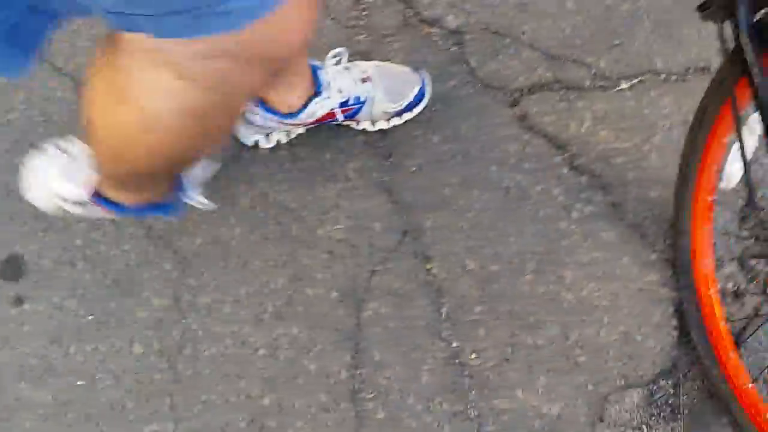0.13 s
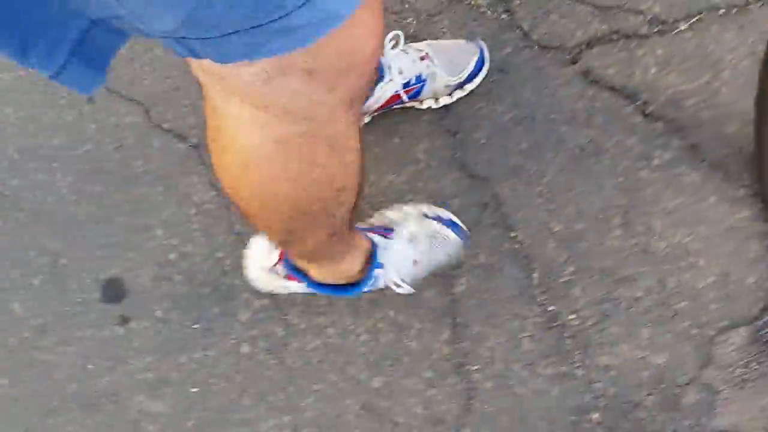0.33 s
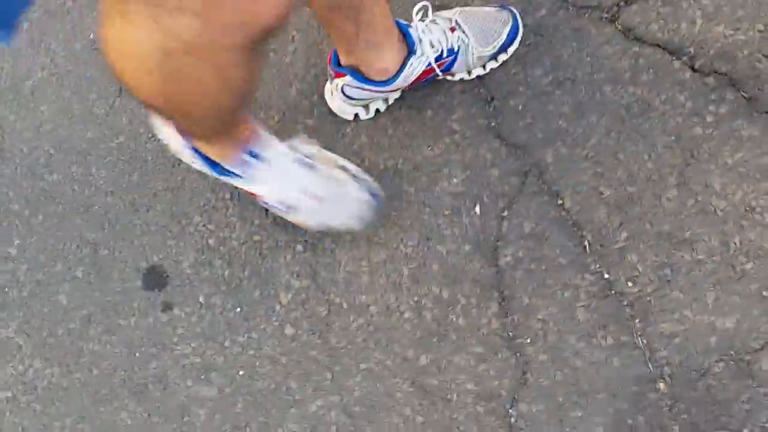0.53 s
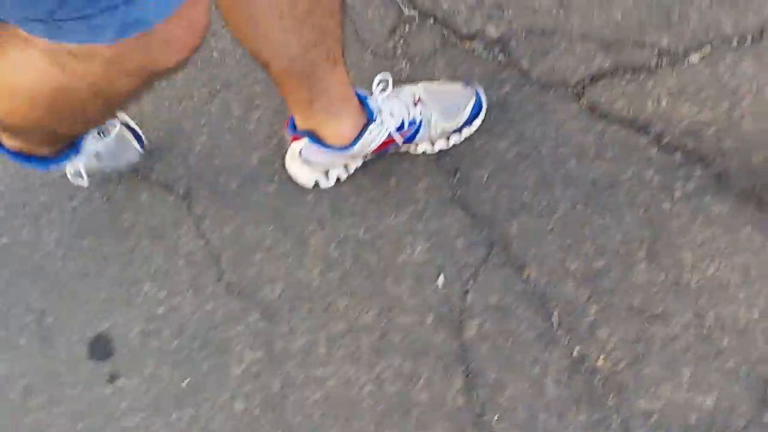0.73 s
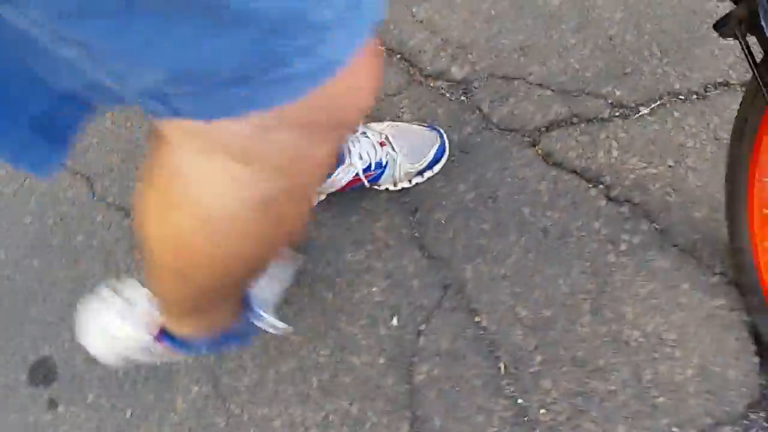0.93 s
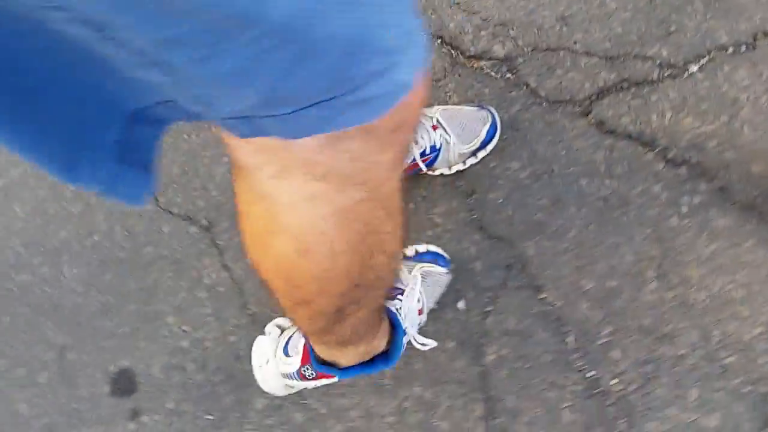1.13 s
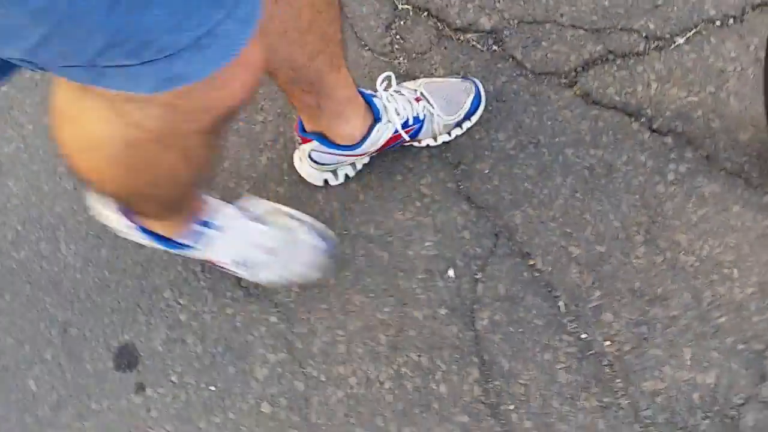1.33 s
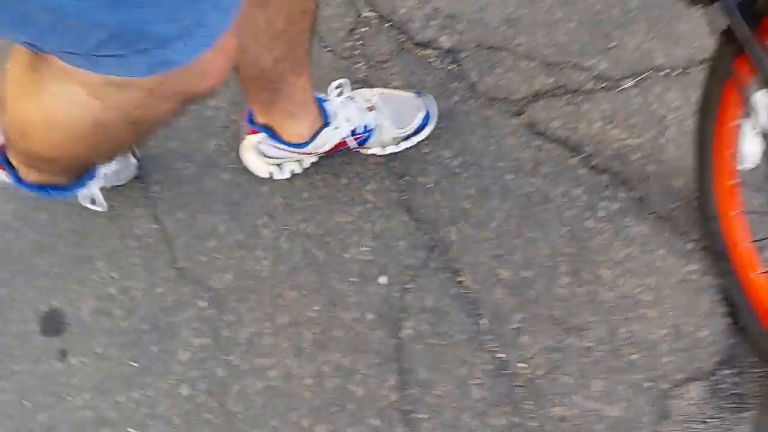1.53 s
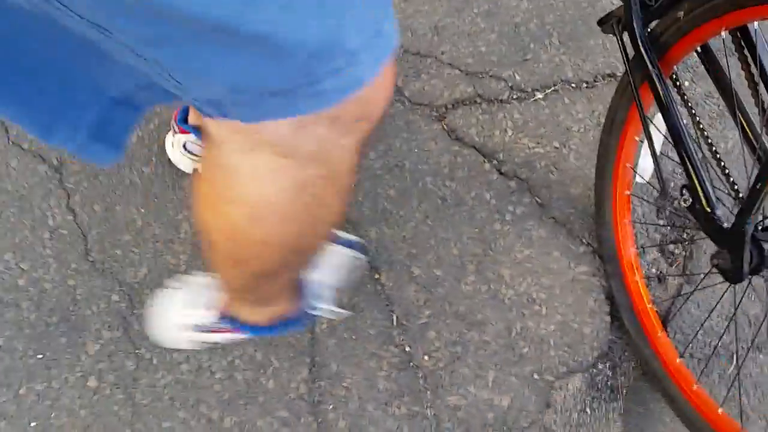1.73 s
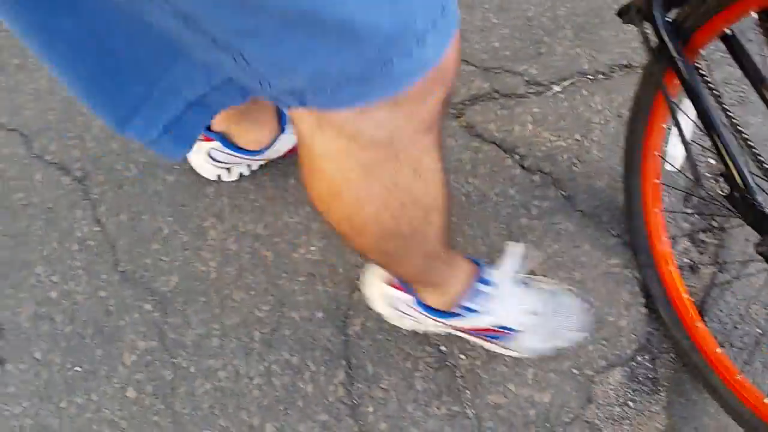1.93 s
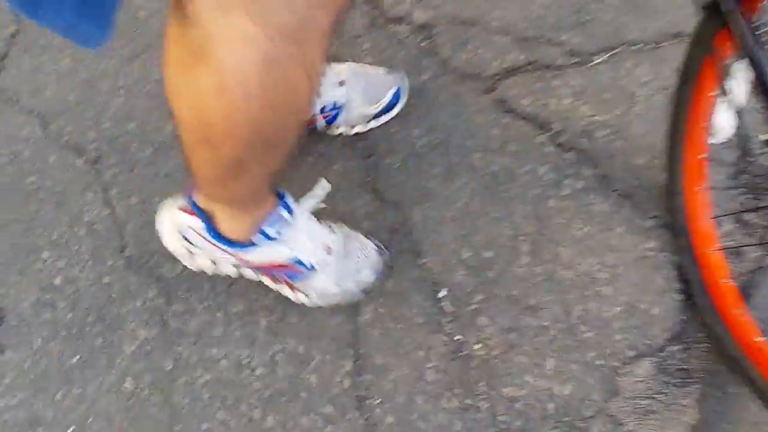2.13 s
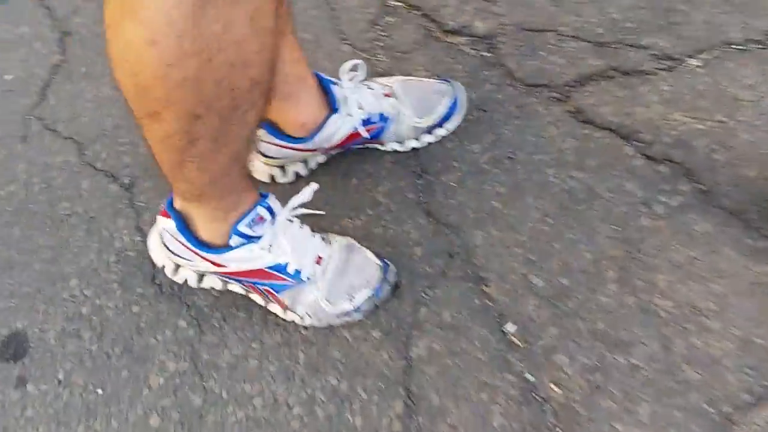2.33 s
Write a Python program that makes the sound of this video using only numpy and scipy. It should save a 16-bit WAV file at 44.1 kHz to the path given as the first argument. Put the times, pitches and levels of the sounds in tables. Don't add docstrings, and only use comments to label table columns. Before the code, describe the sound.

A rubber-soled sports shoe scuffs forward and drags back on rough asphalt, three forward scrapes growing harder with fainter drags between, then quiet distant traffic; outdoors near house fronts, close handheld phone with low wind buffeting.

```python
import sys
import numpy as np
from scipy import signal
from scipy.fft import rfft, irfft, next_fast_len
from scipy.io import wavfile
from scipy.ndimage import uniform_filter1d, map_coordinates

SR = 44100
rng = np.random.default_rng(int(sys.argv[2]) if len(sys.argv) > 2 else 0)


def decibels_to_gain(level_db):
    exponent = np.asarray(level_db, float) / 20
    return 10 ** exponent


def log_audio(samples):
    frames = np.atleast_2d(samples).T
    limited = np.clip(frames, -1, 1)
    pcm = np.round(limited * 32767).astype(np.int16)
    wavfile.write(sys.argv[1], SR, pcm)


N = 109015

# t/s, rasp level/dB, pressure level/dB, fineness level/dB
SCUFF_STROKES = [
    [(0.04, -49, -14, -2.5), (0.084, -37, -9.5, 6.5), (0.2, -35, 1, 2.5), (0.312, -30, 0, 3),
     (0.35, -28, -4.5, 0), (0.405, -30.5, -40, 4), (0.444, -33.5, -8.5, 7), (0.485, -38.5, -1.5, 6.5),
     (0.53, -63, -13, 9)],
    [(0.918, -48, -8, -1), (0.927, -38, 4, 1), (0.971, -30.5, -4.5, -2), (1.0, -27, 1.5, 0.5),
     (1.043, -26, 4.5, 2.5), (1.09, -28, 2, 2.5), (1.129, -26, -7, 5), (1.148, -50, -12, -3)],
    [(1.677, -45, -4, 0), (1.684, -38, 2, 1), (1.722, -33, -3.5, -6), (1.75, -23.5, -6.5, -3),
     (1.775, -27.5, -3, -2), (1.814, -25.5, 8, 4), (1.85, -25.5, -7, 2), (1.888, -21.5, -7, 1.5),
     (1.895, -43, 10, -10)],
]
# t/s, rasp level/dB, pressure level/dB, fineness level/dB
DRAG_STROKES = [
    [(0.53, -69, -21, -7), (0.544, -51, -27, 6), (0.606, -35.5, -7, 9), (0.706, -33, -3, 9),
     (0.72, -35, -4, 9), (0.76, -40.5, -1, 2), (0.796, -42, -6, -14), (0.825, -59, 0, -5),
     (0.918, -53, 0, 0)],
    [(1.15, -59, 1, 12), (1.275, -59, -13, 13), (1.305, -46.5, -12, 9.5), (1.41, -45.5, -10, 6),
     (1.465, -36, -1, 6.5), (1.495, -41.5, -12, 3), (1.545, -40.5, -7, -9), (1.59, -64, 4, -7),
     (1.67, -54.5, 3, -1)],
    [(2.27, -69, 7, -2), (2.29, -49, -3, 1), (2.3, -44, -6, -6), (2.322, -59, 1, -13), (2.334, -60, -6, -5),
     (2.345, -70, 7, 0)],
]
# t/s, level/dB, centre f/Hz, rise t/s
STONE_TICKS = [(0.085, -20, 8000, 0.0014), (0.0892, -21, 9000, .0012), (0.0972, -20, 7000, .002),
               (0.1773, -33, 2500, 0.00058), (.2148, -27, 5000, 0.00063), (0.2558, -25.5, 2200, 0.00054),
               (.292, -27, 12000, .002), (0.366, -21, 3000, 0.00044), (0.3737, -17.5, 6000, 0.00073),
               (0.379, -21, 2500, 0.00037), (0.3978, -19, 3000, 0.0012), (0.4062, -18, 5540, 0.00081),
               (0.4748, -24, 2180, 0.00064), (0.489, -27, 1700, 0.00067), (.494, -35, 11000, 0.00066),
               (0.515, -30.5, 11000, 0.0009), (.521, -35, 13000, .0007), (0.565, -26, 9400, 0.002),
               (.611, -23, 7600, 0.0013), (0.6594, -19, 7000, 0.00058), (.7022, -25, 2440, 0.001),
               (0.7332, -30, 9000, 0.00062), (0.7886, -37, 2800, 0.00036), (0.861, -43, 13500, 0.0018),
               (.974, -22, 11000, 0.0018), (.99, -21, 13500, .001), (1.0446, -23, 2500, 0.00046),
               (1.067, -19, 3000, 0.00068), (1.157, -30.5, 10000, 0.0024), (1.2933, -29, 5450, .0009),
               (1.3132, -33, 5000, 0.00093), (1.3322, -35, 4030, 0.00094), (1.414, -43, 3500, 0.0004),
               (1.415, -31.5, 7040, 0.0013), (1.482, -23, 11200, 0.0016), (1.523, -38, 11000, .001),
               (1.539, -24, 2980, 0.0004), (1.552, -30, 2940, 0.00034), (1.6382, -37, 4000, 0.00062),
               (1.706, -24, 6500, 0.00087), (1.7083, -23, 13100, 0.0018), (1.732, -25, 6500, 0.00095),
               (1.752, -17, 10000, .002), (1.758, -13.5, 4420, .0008), (1.8287, -12, 3000, 0.00035),
               (1.884, -21, 12000, .001), (1.888, -13.5, 13500, 0.00073), (2.1245, -37, 2300, 0.0012),
               (2.316, -42, 2070, 0.0011)]
# t/s, level/dB, f/Hz
KNOCKS_AND_THUMPS = [(0.082, -23, 87), (.148, -27, 98), (0.292, -17.5, 156), (0.312, -13.5, 156),
                     (0.398, -17, 1070), (0.426, -19, 1160), (.475, -21.5, 865), (.488, -22.5, 1020),
                     (0.996, -20, 136), (1.038, -14.5, 185), (1.313, -27.5, 1080), (1.538, -22, 2020),
                     (1.79, -18.5, 180), (1.884, -22, 1290), (.12, -22, 195), (.358, -33, 197), (.445, -28, 164),
                     (0.891, -32, 65), (1.13, -24.5, 167), (0.441, -26.5, 60.5), (.5, -26.5, 76.4),
                     (0.561, -29.5, 55), (2.288, -26.5, 75.4), (2.351, -31, 61)]
# t/s, length t/s, level/dB, f/Hz, width f/Hz
PEBBLE_RUBS = [(.743, .05, -34, 4550, 450), (.77, .045, -34, 3100, 400), (1.478, .015, -38, 5000, 1200),
               (1.498, .045, -35, 4800, 1000), (1.53, .045, -41, 3000, 1000), (.17, .2, -30, 230, 220),
               (.38, .125, -36, 1050, 900), (1.42, .09, -40, 1200, 700), (.08, .14, -36, 1200, 600),
               (.28, .08, -32, 400, 200), (1.44, .04, -38, 1300, 900), (1.545, .04, -46, 1200, 900),
               (.07, .12, -36, 310, 120), (1.79, .09, -27, 6000, 2000)]
# f/Hz, width f/Hz, level/dB
SOLE_MODES = [(369, 240, -1.5), (516, 166, 3.5), (656, 247, 1)]
# f/Hz, width f/Hz, level/dB
TREAD_MODES = [(836, 380, -1.5), (1200, 260, 3.5)]
# f/Hz, density level/dB per Hz
GRIT_SPECTRUM = [(300, -9), (1500, 0.5), (8000, -1.5), (11000, -10)]
# f/Hz, density level/dB per Hz
DUST_SPECTRUM = [(5000, -44), (8000, -1), (12000, -1), (16000, 5)]
# f/Hz, left-right likeness/1
SHOE_ALIKE = [(160, 0.82), (1200, 0.95), (2000, 0.15), (3500, 0.98), (6000, 0.083)]
# f/Hz, t60/s
YARD_T60 = [(300, 0.49), (2000, 0.66), (10000, 0.4)]
# t/s, strength level/dB
WIND_STRENGTH = [
    (0.0, -30),
    (0.26, -37.5),
    (0.42, -31),
    (0.57, -31),
    (0.6, -45),
    (2.25, -52),
    (2.3, -39),
    (2.47, -62),
]
# f/Hz, density level/dB per Hz
BUFFET_SPECTRUM = [(20, -3.5), (45, -7.5), (100, -3.5), (200, -26.5), (400, -43.5)]
# f/Hz, density level/dB per Hz
TRAFFIC_SPECTRUM = [(25, -42), (60, 2), (110, 2.5), (300, -7.5), (700, -17.5), (2000, -24.5), (6000, -32.5),
                    (15000, -35)]
# f/Hz, left-right likeness/1
TRAFFIC_ALIKE = [(100, 0.99), (450, 0.77), (750, 0.19), (1200, -0.28), (3000, -0.68)]
# f/Hz, width f/Hz, level/dB
INSECT_BANDS = [(2270, 120, 0), (4850, 450, -.5), (7400, 320, 0), (14800, 590, -2)]
# f/Hz, level/dB
LEFT_PORT_COLOUR = [(30, -3.5), (1500, 2.5), (7600, 4), (8600, -1.5), (9400, -7), (12500, -4),
                    (14500, -6.5), (16000, -9)]
# f/Hz, level/dB
RIGHT_PORT_COLOUR = [(1500, -1), (1950, -6.5), (4500, -18), (8000, -60), (9500, -10.5), (12000, -3),
                     (13500, 4.5), (16000, -6)]

RASP_DB, FINE_DB, SOLE_DB, TREAD_DB = 4.5, 4.5, -1, -4.5
TREAD_DB_PER_PRESS_DB = 0.67
GRIP_DB = 35
CHIPS_DB = 1.8
STONE_WIDTH_RATIO, STONE_STEEPNESS = 1.3, 1.6
KNOCK_CYCLES, KNOCK_MIN_S, KNOCK_RISE_RATIO = 7, 0.004, 0.11
KNOCK_SIDE_GAIN = 0.3
YARD_DB, YARD_DELAY_S = -21, 0.012
BUFFET_RIGHT_DB = 4.5
TRAFFIC_DB, INSECT_DB = -40, -60
PORT_CEILING = 0.95
TOP_HZ, TOP_SLOPE_HZ = 15800, 45


def unit(x):
    return x / np.sqrt(np.mean(x ** 2) + 1e-20)


def along(points, hz):
    f, value = np.transpose(points)
    return np.interp(np.log(hz + 1), np.log(f + 1), value)


def wobble(rate_hz):
    knots = rng.standard_normal(int(N * rate_hz / SR) + 4)
    return map_coordinates(knots, [np.arange(N) * rate_hz / SR])


def filtered(x, response):
    m = next_fast_len(N + SR // 2)
    hz = np.fft.rfftfreq(m, 1 / SR)
    return irfft(rfft(x, m) * response(hz), m)[..., :N]


def resonances(peaks):
    def response(f):
        total = 0
        for k, (centre, width, db) in enumerate(peaks):
            damping = 1j * f * width
            total = total + (-1) ** k * decibels_to_gain(db) * damping / (centre * centre - f * f + damping)
        return total
    return response


def spread(pair, alike):
    def mid_side(hz):
        turn = np.arccos(np.clip(along(alike, hz), -1, 1)) / 2
        return np.array([np.cos(turn), np.sin(turn)])
    mid, side = filtered(pair, mid_side)
    return np.array([mid + side, mid - side])


def grains(response, spiky_db, clump_db):
    clumps = 2 * np.tanh((wobble(400) + wobble(90) + 0.59 * wobble(24.62)) / 2)
    size_db = spiky_db * np.minimum(rng.exponential(size=N), 6) + clump_db * clumps
    return unit(filtered(rng.standard_normal((2, N)) * decibels_to_gain(size_db), response))


def shoe():
    t, out = np.arange(N) / SR, np.zeros((2, N))
    grit = chips(grains(lambda hz: decibels_to_gain(along(GRIT_SPECTRUM, hz)), spiky_db=1.5, clump_db=1.5))
    dust = grains(lambda hz: decibels_to_gain(along(DUST_SPECTRUM, hz)), spiky_db=3.0, clump_db=2.0)
    sole = grains(lambda hz: resonances(SOLE_MODES)(hz) / (1 + (hz / 1100) ** 4), spiky_db=3, clump_db=1.5)
    tread = grains(lambda hz: resonances(TREAD_MODES)(hz) / (1 + (hz / 1450) ** 4), spiky_db=3, clump_db=1.2)
    for stroke in list(SCUFF_STROKES) + list(DRAG_STROKES):
        s, rasp, press, fine = np.transpose(stroke)
        rasp_db = np.interp(t, s, rasp, left=-120, right=-120)
        press_db = np.minimum(np.interp(t, s, press), rasp_db + GRIP_DB)
        fine_db = np.interp(t, s, fine)
        body = decibels_to_gain(SOLE_DB + press_db) * sole
        body = body + decibels_to_gain(TREAD_DB + TREAD_DB_PER_PRESS_DB * press_db) * tread
        out += decibels_to_gain(rasp_db) * (decibels_to_gain(RASP_DB) * grit + decibels_to_gain(FINE_DB + fine_db) * dust + body)
    return out


def chips(x):
    z = signal.stft(x, nperseg=128)[2]
    field = rng.standard_normal(z.shape[1:])
    field = uniform_filter1d(field, size=3, axis=0)
    field = uniform_filter1d(field, size=5, axis=1)
    return unit(signal.istft(z * decibels_to_gain(CHIPS_DB * unit(field)), nperseg=128)[1][:, :N])


def stones():
    out, t = np.zeros((2, N + SR)), np.arange(1024) / SR
    f = np.fft.rfftfreq(len(t), 1 / SR)
    noise = rfft(rng.standard_normal((len(STONE_TICKS), 2, len(t))))
    for (s, db, hz, rise), z in zip(STONE_TICKS, noise):
        band = resonances([(hz, STONE_WIDTH_RATIO * hz, 0)])(f) ** STONE_STEEPNESS
        burst = unit(irfft(z * band))
        envelope = t / rise * np.exp(1 - t / rise)
        out[:, round(s * SR):][:, :len(t)] += decibels_to_gain(db) * envelope * burst
    return out[:, :N]


def knocks():
    out, t = np.zeros(N + SR), np.arange(SR // 5) / SR
    for s, db, hz in KNOCKS_AND_THUMPS:
        t60 = KNOCK_MIN_S + KNOCK_CYCLES / hz
        rise = 1 - np.exp(-t / (KNOCK_RISE_RATIO * t60))
        decay = decibels_to_gain(db + 8.5 - 60 * t / t60)
        out[round(s * SR):][:len(t)] += decay * rise * np.sin(2 * np.pi * hz * t)
    return out[:N] * [[1], [KNOCK_SIDE_GAIN]]


def pebble():
    t, out = np.arange(N) / SR, np.zeros((2, N))
    for s, length, db, hz, width in PEBBLE_RUBS:
        mode = resonances([(hz, width, 0)])
        rattle = grains(lambda f: mode(f) ** 1.4, spiky_db=4.5, clump_db=3.5)
        out += decibels_to_gain(db) * np.sin(np.pi * np.clip((t - s) / length, 0, 1)) * rattle
    return out


def yard(x):
    hz, t, z = signal.stft(rng.standard_normal((2, SR // 2)), SR, nperseg=256)
    decay = decibels_to_gain(-60 * t / along(YARD_T60, hz)[:, None])
    tail = signal.istft(z * decay, SR, nperseg=256)[1]
    late = np.pad(x, ((0, 0), (round(YARD_DELAY_S * SR), 0)))
    return signal.fftconvolve(late, tail / np.linalg.norm(tail[0]), axes=1)[:, :N]


def wind():
    strength_db = np.interp(np.arange(N) / SR, *np.transpose(WIND_STRENGTH))
    gusts_db = 1.8 * np.array([wobble(12.7), wobble(11.63)])
    push = unit(filtered(rng.standard_normal((2, N)), lambda hz: decibels_to_gain(along(BUFFET_SPECTRUM, hz))))
    return decibels_to_gain(strength_db + gusts_db) * push * decibels_to_gain([[0], [BUFFET_RIGHT_DB]])


def traffic():
    noise = rng.standard_normal((2, N))
    roar = unit(filtered(noise, lambda hz: decibels_to_gain(along(TRAFFIC_SPECTRUM, hz))))
    return decibels_to_gain(TRAFFIC_DB + 1.24 * wobble(4.69)) * spread(roar, TRAFFIC_ALIKE)


def insects():
    noise = rng.standard_normal((2, N))
    drone = unit(filtered(noise, lambda hz: sum(resonances([band])(hz) ** 2 for band in INSECT_BANDS)))
    swell_db = 3 * wobble(14) + 0.6 * wobble(3)
    return decibels_to_gain(INSECT_DB + swell_db) * drone


def scene():
    near = spread(shoe() + stones() + knocks() + pebble(), SHOE_ALIKE)
    return near + decibels_to_gain(YARD_DB) * yard(near) + wind() + traffic() + insects()


def top_cut(x):
    return signal.sosfilt(signal.butter(12, 16240, fs=SR, output="sos"), x)


def record(dry):
    ports = filtered(dry, lambda hz: decibels_to_gain([along(LEFT_PORT_COLOUR, hz), along(RIGHT_PORT_COLOUR, hz)]))
    ports = ports / (1 + np.abs(ports / PORT_CEILING) ** 4) ** (1 / 4)
    ports = filtered(ports, lambda hz: 1 / (1 + np.exp(np.clip((hz - TOP_HZ) / TOP_SLOPE_HZ, -50, 50))))
    return top_cut(ports)


dry = scene()
out = record(dry)
log_audio(out)
```